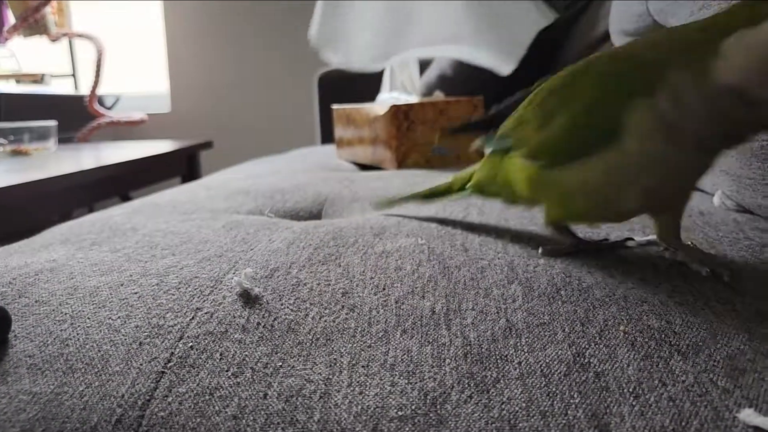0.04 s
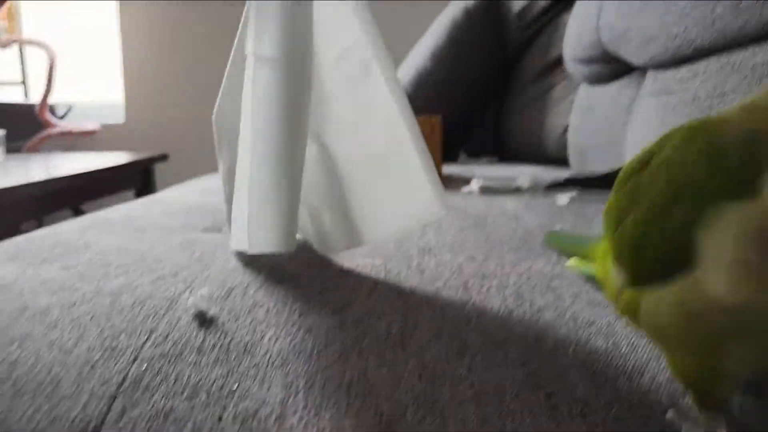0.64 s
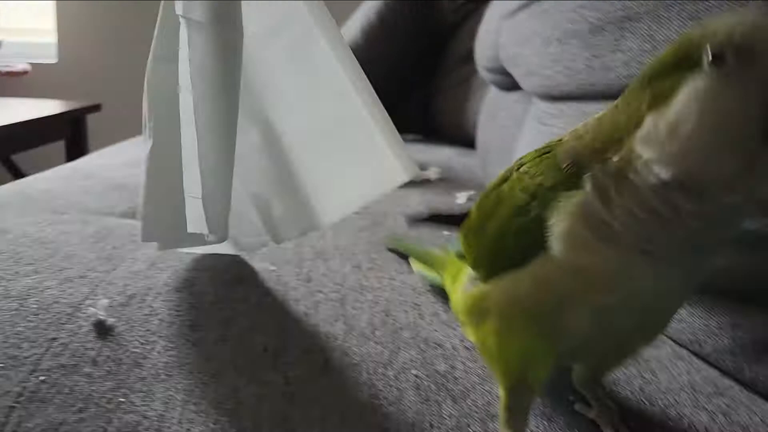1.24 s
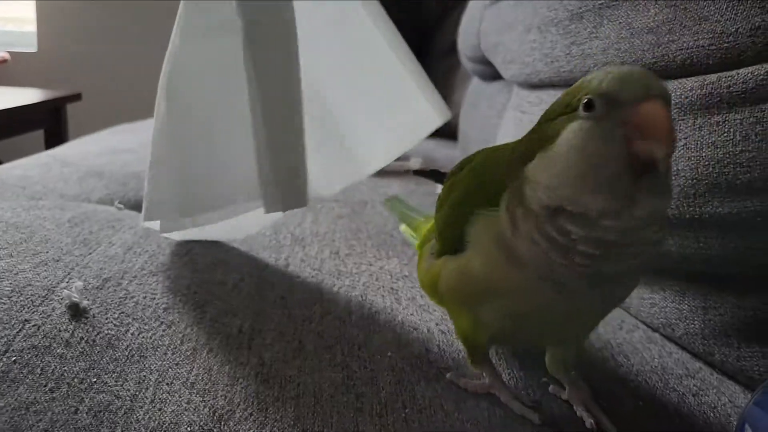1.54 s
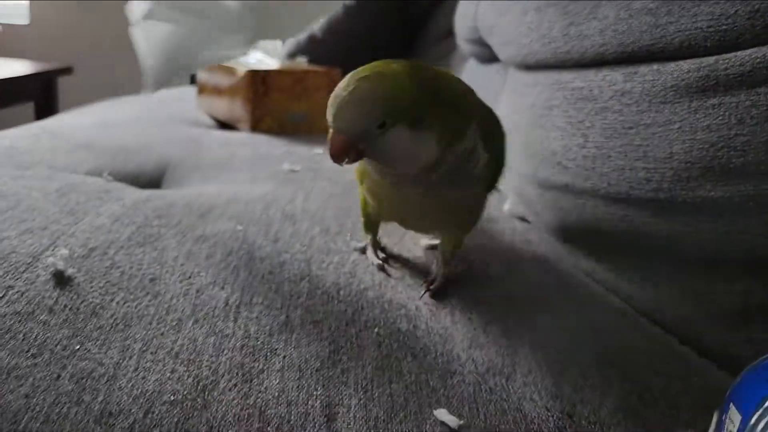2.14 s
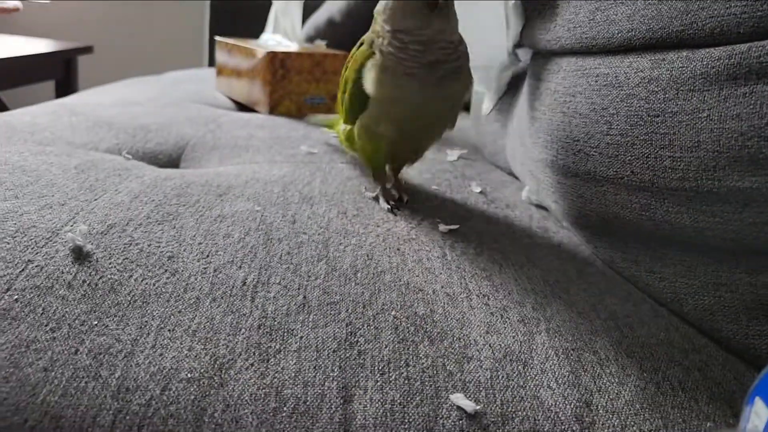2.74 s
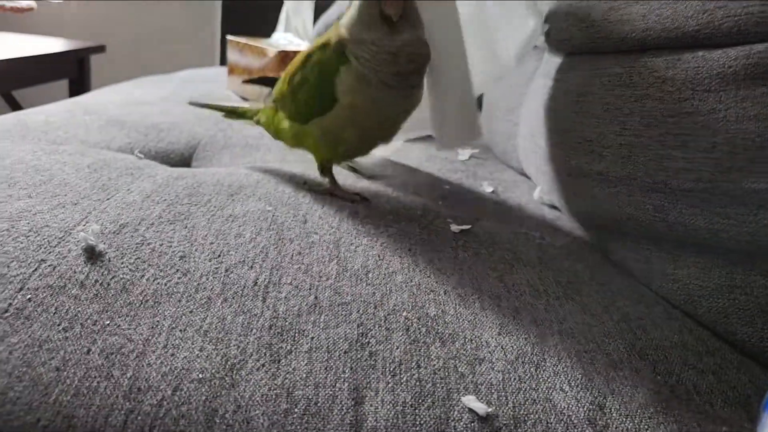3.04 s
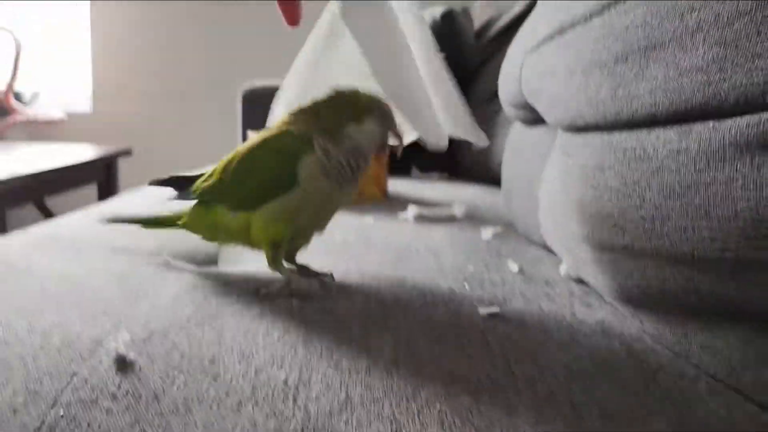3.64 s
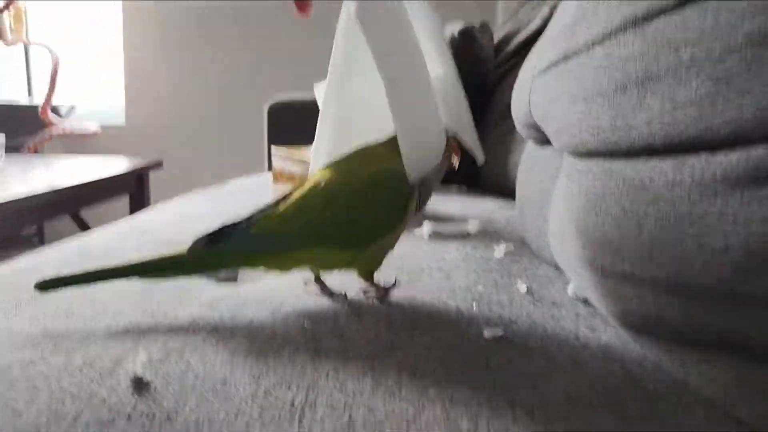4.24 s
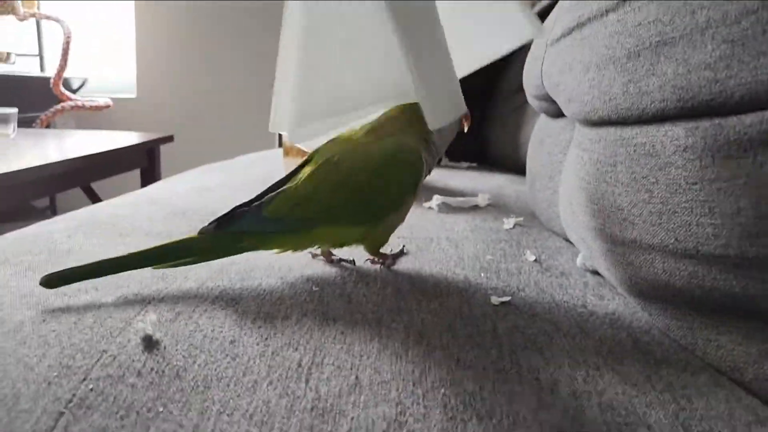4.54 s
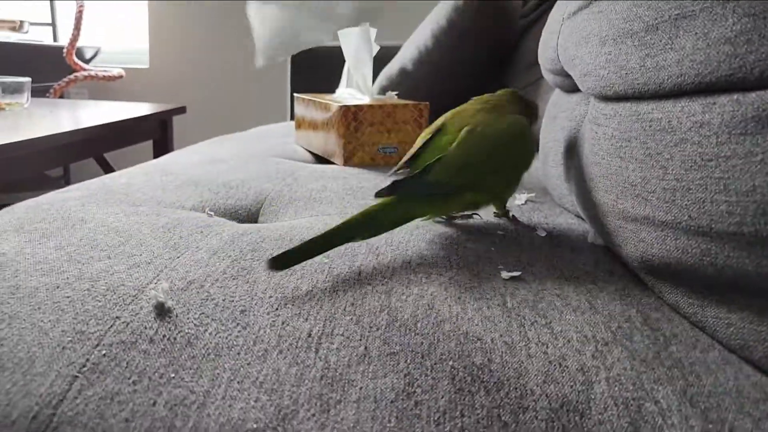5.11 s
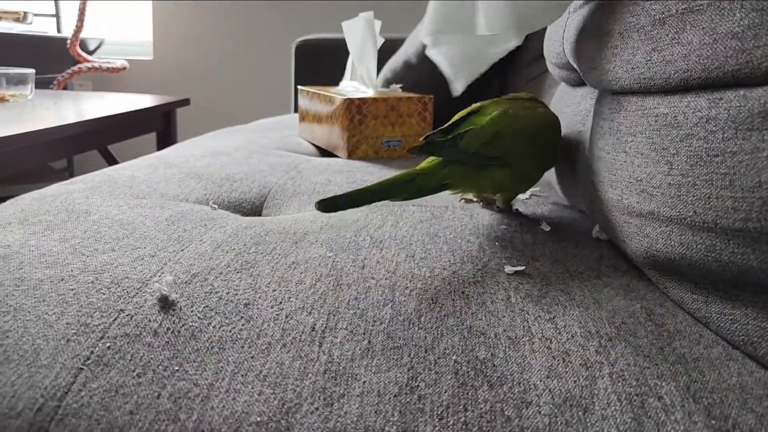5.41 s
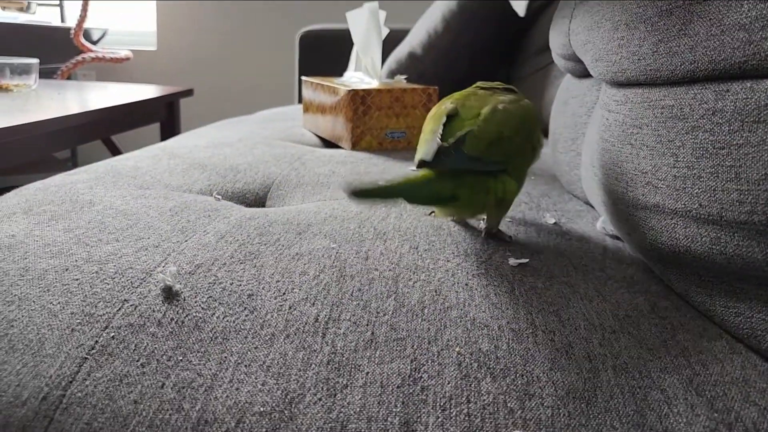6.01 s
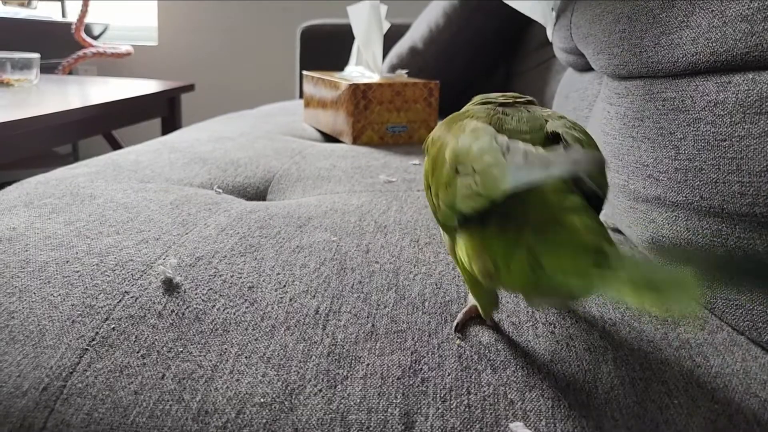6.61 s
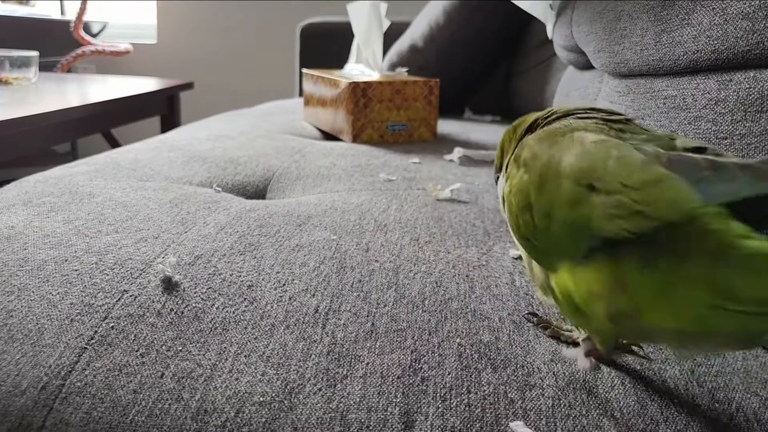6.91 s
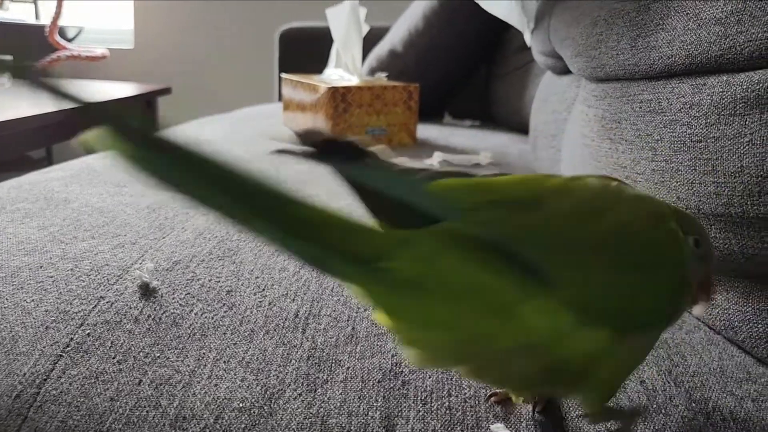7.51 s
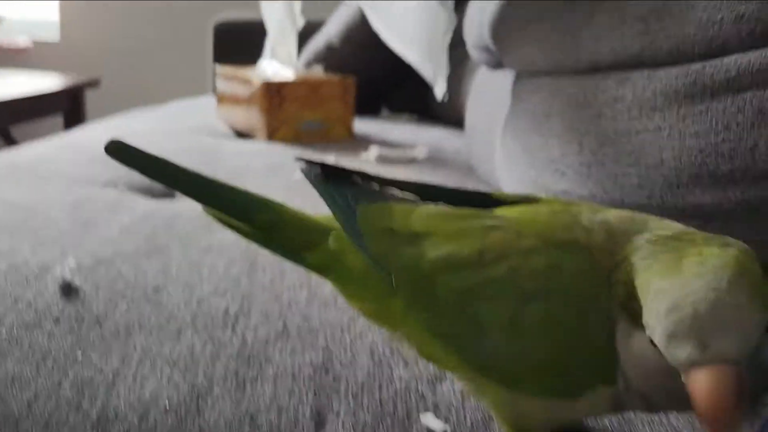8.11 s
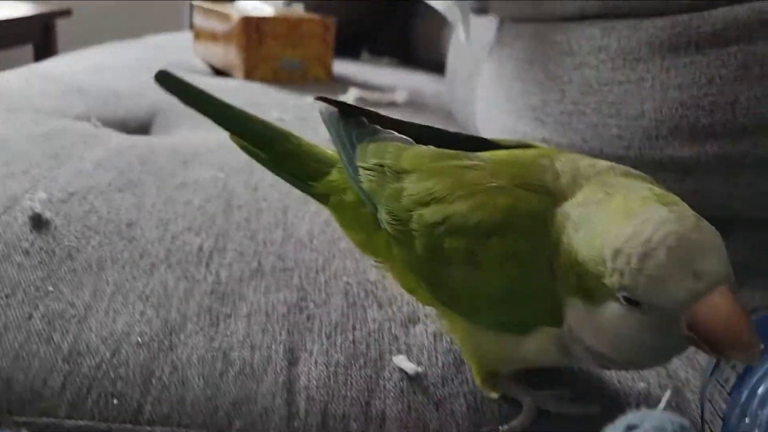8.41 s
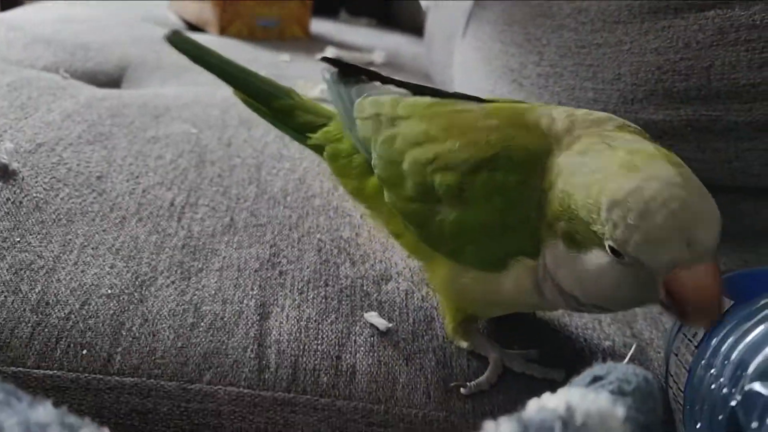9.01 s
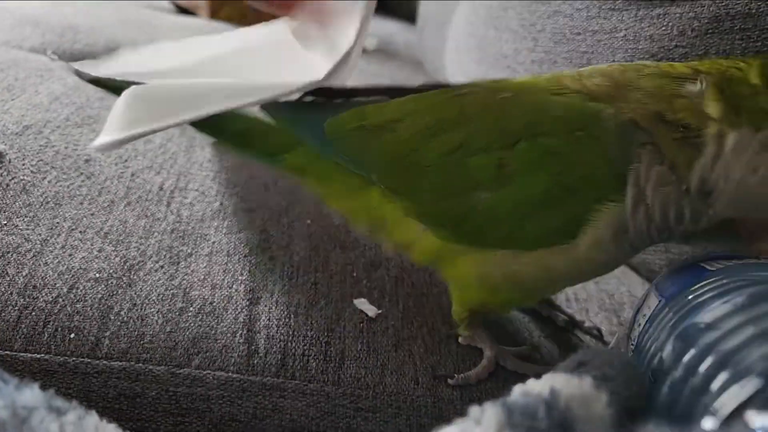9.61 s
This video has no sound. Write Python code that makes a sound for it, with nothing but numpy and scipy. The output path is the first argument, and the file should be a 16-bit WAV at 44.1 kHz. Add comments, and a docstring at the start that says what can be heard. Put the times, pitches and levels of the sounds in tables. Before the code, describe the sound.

A small parrot chatters close to the microphones in a quiet living room with a faint low rumble. From the start until about 3.2 seconds it gives short, hoarse clucks, several a second, with two clean rising whistles between 0.5 and 0.8 seconds and a falling chirp at 1.2. Three more chirps grow softer between 3.3 and 3.8 seconds. A tissue swishes very faintly underneath, and briefly again in the lull at 5 seconds. From 5.2 to 8.2 seconds the bird runs through fast, trilled warbles, with two loud, bright, falling squawks at about 6.8 and 7.3 seconds. From 7.7 to 9.5 seconds its steps and bumps make soft thuds and set a plastic bottle ringing low and hollow, while beak and claws add sharp little ticks and faint scratching. One quiet falling chirp comes at 9.5 seconds.

```python
"""Parrot on a sofa

A small parrot chatters while a dangled tissue swishes beside it. Its syrinx is the source, its throat
and beak the filter: hoarse clucks, whistles and chirps, then fast warbles and squawks. At the end it
steps up to a plastic bottle, bumps it into ringing and ticks at it with beak and claws.
Two close microphones pick up the bird, the faint answer of the living room and a low rumble."""
import sys
import numpy as np
from scipy import signal
from scipy.fft import rfft, irfft, next_fast_len
from scipy.io import wavfile
from scipy.ndimage import uniform_filter1d, map_coordinates

SR = 44100
rng = np.random.default_rng(int(sys.argv[2]) if len(sys.argv) > 2 else 0)


def waveform_to_disk(signal):
    """Save audio, clipped to [-1, 1], as 16-bit WAV at the path in sys.argv[1]."""
    frames = np.transpose(np.atleast_2d(signal))
    scaled = np.clip(frames, -1, 1) * 32767
    samples = np.round(scaled).astype(np.int16)
    wavfile.write(sys.argv[1], SR, samples)


N = 429975
EDGE_HZ = 16200  # upper band limit
FLUTTER_HZ = 80  # bandwidth of quick, random wavering

# response of throat and beak in clucks, whistles and chirps: (frequency [Hz], gain [dB])
SHORT_CALL_TRACT = [(300, -15), (550, 0.5), (1100, -4.5), (1800, 1), (3500, -0.4), (5000, -9.5),
                    (7700, -15), (9300, -31.5)]
# response of throat and beak in warbles and squawks: (frequency [Hz], gain [dB])
WARBLE_TRACT = [(500, -13), (800, -6.5), (1200, -7.5), (2200, -2.5), (3500, -1.5), (4600, -5.5),
                (5500, -15), (8200, -18), (10000, -16.5), (13000, -33)]
# response of the plastic to a tick or scratch: (frequency [Hz], gain [dB])
PLASTIC_RESPONSE = [(1500, 9), (4500, -2), (7000, -15.5), (15000, -6)]


def gain_of(db):
    """Amplitude ratio of a level in decibels."""
    return 10 ** (np.asarray(db) / 20)


def unit_rms(x):
    """Normalisation to an rms of 1."""
    return x / np.sqrt(np.mean(x ** 2) + 1e-20)


def gain_at(points, hz):
    """Amplitude gain of a decibel spectrum, interpolated over log frequency."""
    f, db = np.transpose(points)
    return gain_of(np.interp(np.log(hz + 1), np.log(f + 1), db))


def add(mix, s, sound):
    """Superposition: a sound joins the mix at time s."""
    part = mix[max(round(s * SR), 0):][:len(sound)]
    part += sound[:len(part)]


def coloured(x, points):
    """Zero-phase filtering by a decibel spectrum."""
    size = next_fast_len(2 * x.shape[-1])
    spectrum = rfft(x, size) * gain_at(points, np.fft.rfftfreq(size, 1 / SR))
    return irfft(spectrum, size)[..., :x.shape[-1]]


def wander(count, hz):
    """Low-pass Gaussian noise of rms 1, reaching to about hz."""
    f = np.fft.rfftfreq(count, 1 / SR)
    return unit_rms(irfft(rfft(rng.standard_normal(count)) * np.exp(-(f / hz) ** 2), count))


def background(rumble_db=-56, whine_hz=4300, whine_db=-82):
    """Partly coherent noise: rumble alike on both sides, faint diffuse hiss, and a thin whine."""
    # spectrum of the quiet room: (frequency [Hz], relative density [dB])
    ambience = [(20, -33), (59, -3.5), (87, -12.5), (210, -22), (450, -21.5), (1100, -35), (4400, -44.5),
                (5600, -57), (15000, -60)]
    # its stereo width: (frequency [Hz], side over middle [dB])
    width = [(60, -24), (180, -13), (550, -4), (1650, 1)]
    mid, side = unit_rms(coloured(rng.standard_normal((2, N)), ambience))
    side = coloured(side, width)
    whine = gain_of(whine_db) * np.sin(2 * np.pi * whine_hz * np.arange(N) / SR)
    return gain_of(rumble_db) * (mid + np.array([side, -side])) + whine


def fading_note(hz=2643, db=-47, t60=.3):
    """Exponential decay: a thin, wavering note dies away at the start."""
    t = np.arange(N) / SR
    envelope = gain_of(db - 60 * np.minimum(t / t60, 2))
    return envelope * np.sin(2 * np.pi * hz * t + wander(N, FLUTTER_HZ) / 2)


def ticks(decay_s=0.00066, lowest_hz=1200):
    """Impact excitation: beak and claws strike short, heavily damped knocks from the plastic."""
    # strikes: (time [s], peak before filtering [dB])
    strikes = [(0.092, -28), (7.871, -28), (8.351, -29), (8.397, -34.5), (8.565, -32), (8.814, -40),
               (8.927, -40), (9.053, -28)]
    out, t = np.zeros(N), np.arange(SR // 2) / SR
    for s, db in strikes:
        hz = lowest_hz * 2 ** rng.random()  # each spot knocks at its own pitch
        tick = (rng.standard_normal(len(t)) + np.sin(2 * np.pi * hz * t)) * np.exp(-t / decay_s)
        add(out, s, gain_of(db) * coloured(tick / abs(tick).max(), PLASTIC_RESPONSE))
    return out


def tract_response(tract, delay_s_per_khz=.0003):
    """Minimum-phase cavity response at each whole Hz; dispersion in the windpipe delays high partials."""
    hz = abs(np.fft.fftfreq(SR, 1 / SR))
    log_response = np.conj(signal.hilbert(np.log(gain_at(tract, hz))))
    return np.exp(log_response - 1j * np.pi * delay_s_per_khz * hz ** 2 / 1000)


def syrinx(start, hz, db, beak_db, nasal_hz, tract, jitter, rasp_db, steady,
           fade_s=.005, brighten=0.36, wobble=.3):
    """Source and filter: membranes pulse into the tract, and the slacker they are, the more unevenly."""
    # hiss of air at the edge of the beak: (frequency [Hz], gain [dB])
    edge_hiss = [(8500, -44.5), (11500, -0.5)]
    nasal_db, nasal_half_width_octaves = 4.5, 0.088
    wobble_hz, fray_rad, doubling = 98, 0.02, 0.068
    flutter_db, sizzle_db = 2.5, -5.5
    hz, db = (np.pad(curve, int(fade_s / 2 * SR), "edge") for curve in (hz, db))
    count, slack = len(hz), np.minimum(900 / hz, 1)
    hz = hz * np.exp(jitter * (slack * wander(count, 340) + wobble * wander(count, wobble_hz)))
    # each pulse comes a little early or late, which frays the high harmonics
    phase = 2 * np.pi * np.cumsum(hz) / SR + fray_rad * wander(count, 800)
    harmonic = np.arange(1, int(EDGE_HZ / hz.min()) + 1)[:, None]
    partial_hz = harmonic * hz
    # a harder push and a wider beak make the call brighter
    effort_db = db + 25.5
    tilt = gain_of((brighten * effort_db - beak_db) * np.log2(harmonic))
    # the nasal resonance drifts as the tongue moves
    detune = np.log2(partial_hz / nasal_hz) + .06 * wander(count, 40)
    nasal = 1 + (gain_of(nasal_db) - 1) / (1 + 1j * detune / nasal_half_width_octaves)
    cavity = tract_response(tract)[np.minimum(partial_hz, EDGE_HZ).astype(int)]
    weight = cavity * (partial_hz < EDGE_HZ) * tilt * nasal
    weight[1] *= (hz / 750) ** 0.5  # taut membranes favour the second harmonic
    strength = np.sqrt((abs(weight) ** 2).sum(0) / 2)
    tone = -(weight * np.exp(1j * harmonic * phase)).real.sum(0) / strength
    # period doubling: now and then strong and weak pulses alternate
    tone *= 1 + doubling * wander(count, wobble_hz) * np.cos(phase / 2)
    # air hisses through each opening of the membranes
    air = rng.standard_normal(count) * (1 + np.cos(phase)) ** 2
    sizzle = gain_of(sizzle_db + effort_db) * unit_rms(coloured(air, edge_hiss))
    puffs = unit_rms(coloured(air, tract)) + sizzle
    shimmer = np.exp(4 * jitter * slack * wander(count, 700))
    voice = tone * shimmer + gain_of(rasp_db) * slack * puffs
    flutter = gain_of(flutter_db * np.tanh(wander(count, FLUTTER_HZ)))
    # the call swells when a harmonic meets a resonance, unless the bird holds it steady
    voice = unit_rms(voice * strength ** (1 - steady) * flutter)
    fades = signal.windows.tukey(count, min(1, 2 * fade_s * SR / count))
    return start - fade_s / 2, voice * gain_of(db) * fades


def push(length, loudest, swell_db_per_s, drop_db, onset_db=2.5, attack_s=0.0083):
    """Envelope of one breath in dB: a quick attack, a steady swell, then an ever faster fall."""
    progress, top = np.linspace(0, 1, int(length * SR)), np.clip(loudest, 0, .95)
    attack = onset_db * np.exp(-progress * length / attack_s)
    swell = swell_db_per_s * length * np.maximum(top - progress, 0)
    fall = drop_db * (np.maximum(progress - top, 0) / (1 - top)) ** 1.29
    return -attack - swell - fall


def gliding_calls(table, tract, swell_db_per_s, drop_db, **voice):
    """Frequency glides: on one breath each, the pitch slides to a turning point and on to its end."""
    out = np.zeros(N)
    for start, length, start_hz, turn_hz, end_hz, turn, db, loudest, beak_db, nasal_hz in table:
        progress = np.linspace(0, 1, int(length * SR))
        log_hz = np.interp(progress, [0, np.clip(turn, .05, .95), 1], np.log([start_hz, turn_hz, end_hz]))
        level_db = db + push(length, loudest, swell_db_per_s, drop_db)
        add(out, *syrinx(start, np.exp(log_hz), level_db, beak_db, nasal_hz, tract, **voice))
    return out


def clucks():
    """Aperiodic vibration: strong jitter and breath noise make these short calls hoarse."""
    # clucks: (start [s], length [s], start pitch [Hz], turning pitch [Hz], end pitch [Hz], turn at [0-1],
    # level [dB], loudest at [0-1], beak muffling [dB/octave], nasal resonance [Hz])
    cluck_calls = [(0.113, 0.073, 908, 911, 515, 0.3, -19.5, 0, 2, 1680),
                   (0.313, 0.047, 824, 982, 409, 0.35, -20.5, 0.42, 0.5, 2330),
                   (0.916, 0.039, 1494, 944, 669, 0.43, -23.5, 0.81, 2, 1800),
                   (0.967, 0.042, 688, 635, 504, 0.44, -27.5, 0.38, 3, 1410),
                   (1.361, 0.076, 951, 888, 485.4, 0.42, -19.5, 0.63, -1, 1590),
                   (1.556, 0.057, 596, 811, 521, 0.52, -24.5, 0.92, -2, 1670),
                   (1.742, 0.05, 267, 599, 436, 0.73, -20, 0.6, 1.3, 2150),
                   (1.922, 0.053, 1222, 584, 489, 0.5, -20, 0.16, 2.5, 2430),
                   (2.141, 0.026, 1137, 632, 564, 0.53, -19.5, 0, 1.5, 2360),
                   (2.352, 0.019, 1456, 623, 540, 0.45, -20.5, 0.28, 1.7, 3020),
                   (2.556, 0.042, 846, 1245, 674, 0.24, -28.5, 0.52, 1, 3220),
                   (2.727, 0.057, 735, 1076, 459.4, 0.49, -26.5, 0.87, -0.7, 2180),
                   (2.948, 0.041, 171.3, 445, 520, 0.74, -30.5, 0.64, -2.7, 2620),
                   (3.134, 0.046, 760, 1301, 417, 0.21, -24, 0.03, 1, 2420)]
    return gliding_calls(cluck_calls, SHORT_CALL_TRACT, swell_db_per_s=217.5, drop_db=10, jitter=0.036,
                         rasp_db=-19, fade_s=.0026, steady=0.97, brighten=0.54, wobble=.8)


def tissue(flicker_db=8.7):
    """Stick-slip friction: soft paper fibres catch and let go in a fine-grained swish."""
    # swishes: (middle [s], length [s], level [dB], brightness [dB/octave])
    swishes = [(1.703, 2.8, -64.5, 11), (4.217, .3, -71, -5), (5.034, 0.1, -55.5, -8.5),
               (9.699, .2, -63.5, 19)]
    # spectrum of rubbing paper: (frequency [Hz], level [dB])
    paper_spectrum = [(1000, -37), (3500, -9.5), (6000, -25.5), (9500, -9.5), (15000, -20)]
    out = np.zeros(N)
    for s, length, db, tilt_db in swishes:
        count = int(length * SR)
        spectrum = [(hz, level + tilt_db * np.log2(hz)) for hz, level in paper_spectrum]
        grains = coloured(rng.laplace(size=count), spectrum) * gain_of(flicker_db * wander(count, 25))
        add(out, s - length / 2, gain_of(db) * unit_rms(grains) * np.hanning(count))
    return out


def whistles():
    """Nearly periodic vibration: the syrinx slides upward in two clean, slow whistles."""
    # one contour for each whistle: (time [s], pitch [Hz], level [dB])
    contours = [
        [(0.481, 736, -35), (0.514, 1370, -34.5), (0.552, 1650, -24.5), (0.579, 1923, -29), (0.6, 1300, -36.5)],
        [(0.66, 419, -32), (0.689, 1160, -26.5), (0.72, 1340, -29), (0.753, 1734, -26.5), (0.791, 2265, -34.5)],
    ]
    out = np.zeros(N)
    for contour in contours:
        s, pitch, level = np.transpose(contour)
        t = np.arange(s[0], s[-1], 1 / SR)
        hz = np.exp(np.interp(t, s, np.log(pitch)))
        add(out, *syrinx(s[0], hz, np.interp(t, s, level), beak_db=-0.5, nasal_hz=3350,
                         tract=SHORT_CALL_TRACT, jitter=0.014, rasp_db=-34.5, steady=0.83))
    return out


def chirps():
    """Resonance: falling chirps swell as their harmonics sweep through the peaks of the tract."""
    # chirps: columns as for the clucks
    chirp_calls = [(1.194, 0.07, 2232, 1740, 647, 0.35, -27.5, 0.32, -0.79, 3270),
                   (3.3, 0.058, 1577, 1189, 374.6, 0.52, -30, 0.37, -0.3, 1670),
                   (3.507, 0.041, 1311, 1314.0, 420, 0.55, -32, 0.66, 1.9, 2370),
                   (3.787, 0.078, 2560, 1830, 723, 0.46, -39.5, 0.45, -0.48, 1400),
                   (9.542, 0.04, 1596, 1444, 329, 0.32, -37, 0.42, -1.4, 4100)]
    return gliding_calls(chirp_calls, SHORT_CALL_TRACT, swell_db_per_s=225, drop_db=2,
                         jitter=0.033, rasp_db=-20.5, steady=0.17)


def trill(start, length, start_hz, rise_s=.008, sag_s=0.017, last_sag_ratio=.64):
    """Frequency modulation: the pitch sags to a low note, rests, and springs up at each flick."""
    # flicks of pitch: (time of the top [s], low pitch [Hz], top pitch [Hz])
    flicks = [(5.268, 1054, 2173), (5.292, 998, 2180), (5.321, 1035, 2420), (5.434, 787, 1042),
              (5.487, 725, 2365), (6.222, 830, 2498), (6.242, 987, 2413), (6.286, 907.5, 2470),
              (6.403, 741, 1049), (6.427, 683, 1281), (6.449, 914, 2116), (6.479, 1534, 2630),
              (6.594, 912, 1682), (6.619, 988, 1818), (6.648, 1413, 2574), (6.676, 1846, 2460),
              (6.949, 898, 1172), (6.975, 824, 1538), (7.001, 878, 2240), (7.028, 1396, 2657),
              (7.152, 882, 1556), (7.178, 960, 1768), (7.207, 1454, 2400), (7.234, 1630, 2507),
              (7.544, 642.5, 1100), (7.596, 1366, 2594), (7.735, 873, 1964), (7.756, 722, 1923),
              (7.786, 1008, 1923), (7.922, 1060, 2830), (7.953, 1484, 2830), (7.988, 1435, 2647),
              (8.111, 746, 1044), (8.134, 674, 1418), (8.161, 809, 2007)]
    knots = [(start, start_hz)]
    for s, low_hz, top_hz in flicks:
        if start < s < start + length:
            spring = s - rise_s
            knots += [(min(knots[-1][0] + sag_s, spring), low_hz), (spring, low_hz), (s, top_hz)]
    knots.append((knots[-1][0] + sag_s, knots[-1][1] * last_sag_ratio))
    s, hz = np.transpose(knots)
    log_hz = np.interp(start + np.arange(int(length * SR)) / SR, s, np.log(hz))
    return np.exp(uniform_filter1d(log_hz, int(rise_s / 2 * SR)))


def warbles(dip_db_per_octave=0.5):
    """Coupled pitch and amplitude modulation: each trilled syllable thins at the top of a flick."""
    # syllables: (start [s], length [s], start pitch [Hz], level [dB], loudest at [0-1],
    # beak muffling [dB/octave])
    syllables = [(5.237, 0.098, 1295, -27, 0.36, -1.5), (5.399, 0.11, 1467, -30.5, 0.8, 1),
                 (6.204, 0.098, 1297, -23, 0.34, -1.9), (6.371, 0.12, 1637, -25, 0.62, 3),
                 (6.551, 0.13, 823, -21, 0.29, -1), (6.918, 0.13, 1610, -23.5, 0.38, 0.5),
                 (7.11, .14, 777, -20, .2, -0.35), (7.487, 0.081, 943, -33.5, 0, 6.5),
                 (7.568, 0.044, 2295, -30, 0.33, 6), (7.697, 0.098, 1180, -20.5, 1, 3.5),
                 (7.896, 0.11, 1745, -24.5, 0.95, 4), (8.079, 0.091, 1055, -27, 0.26, 4.5)]
    out = np.zeros(N)
    for start, length, start_hz, db, loudest, beak_db in syllables:
        hz = trill(start, length, start_hz)
        level_db = db + push(length, loudest, swell_db_per_s=130, drop_db=4.5)
        level_db -= dip_db_per_octave * np.log2(hz / hz.mean())
        add(out, *syrinx(start, hz, level_db, beak_db, nasal_hz=2330, tract=WARBLE_TRACT,
                         jitter=0.01, rasp_db=-32, steady=1, brighten=0.33, wobble=1.2))
    return out


def squawks():
    """Harmonics grow with effort: two loud, bright squawks fall in pitch, then a soft croak follows."""
    # squawks and croak: columns as for the clucks
    squawk_calls = [(6.775, 0.098, 1473.0, 1133, 667, 0.39, -18, 0.23, -1.76, 2500.0),
                    (7.333, 0.096, 1390, 932, 458.6, 0.5, -19.5, 0.29, -1.1, 2600),
                    (7.44, 0.042, 484, 529, 420, 0.56, -36, 0.31, 4.5, 2580.0)]
    return gliding_calls(squawk_calls, WARBLE_TRACT, swell_db_per_s=198, drop_db=8.5,
                         jitter=0.008, rasp_db=-31, steady=0.4)


def bumps(rise_s=0.0024, decay_s=0.019):
    """Modal ringing: steps and bumps, softened by the cushion, thud and excite the bottle."""
    # steps and bumps: (time [s], level [dB])
    impacts = [(7.694, -35.5), (7.755, -36.5), (8.195, -40), (8.519, -44), (9.047, -41.5), (9.389, -45.5),
               (9.44, -42)]
    # modes of the bottle: (frequency [Hz], relative level [dB], time to fall 60 dB [s])
    bottle_modes = [(123, 0, 0.66), (367, 4, 0.28)]
    out, t = np.zeros(N), np.arange(SR // 2) / SR
    ring = sum(gain_of(db - 60 * t / t60) * np.sin(2 * np.pi * hz * t) for hz, db, t60 in bottle_modes)
    hardest_db = max(db for _, db in impacts)
    for s, db in impacts:
        thud = wander(len(t), 310) * np.exp(-t / decay_s)
        coupling = gain_of(2 * (db - hardest_db))  # light steps barely stir the bottle
        add(out, s, gain_of(db) * (1 - np.exp(-t / rise_s)) * (thud + coupling * ring))
    return out


def scrapes(start_s=8.3, end_s=9.5, db=-69.5, scratches_per_s=250):
    """Shot noise: clumps of tiny scratches as the claws grip fabric and plastic."""
    out, count = np.zeros(N), int((end_s - start_s) * SR)
    grains = rng.standard_normal(count) * (rng.random(count) < scratches_per_s / SR)
    grains *= np.exp(wander(count, 17))
    add(out, start_s, gain_of(db) * unit_rms(coloured(grains, PLASTIC_RESPONSE)))
    return out


def room(x, t60=0.26, early_s=0.0021, early_db=3, echoes_per_s=2500):
    """Reverberation: early reflections off the sofa, then a short tail that has lost its treble."""
    t = np.arange(SR // 2) / SR
    taps = rng.standard_normal((2, len(t))) * (rng.random((2, len(t))) < echoes_per_s / SR)
    tail = coloured(taps * gain_of(-60 * t / t60) * (t > early_s), [(4000, 0), (EDGE_HZ, -10)])
    early = taps * np.exp(-t / early_s) * t
    tail, early = (part / np.linalg.norm(part, axis=1, keepdims=True) for part in (tail, early))
    return signal.fftconvolve(x[None], tail + gain_of(early_db) * early, axes=1)[:, :N]


def scene():
    """Time and level differences between two microphones place the moving bird in the room."""
    # path of the bird: (time [s], lead at the left [ms], left over right [dB], feed to the room [dB])
    bird_path = [(.7, 0.364, 11.5, -16), (2.201, 0.056, 4, -18.5), (3, 0.074, 2.5, -13.5),
                 (5.3, 0.14, -3, -7), (6.25, 0.061, 5.5, -10.5), (6.75, 0.084, 0, -9),
                 (7.249, .18, 5, -14.5), (7.802, 0.39, 9, -14.5)]
    t = np.arange(N) / SR
    s, *columns = np.transpose(bird_path)
    lead_ms, pan_db, room_db = (np.interp(t, s, column) for column in columns)
    parrot = clucks() + chirps() + whistles() + squawks() + warbles()
    direct = parrot + ticks() + bumps() + scrapes() + tissue() + fading_note()
    delayed = map_coordinates(direct, [np.arange(N) - lead_ms * SR / 1000])
    pair = np.array([direct * gain_of(pan_db / 2), delayed * gain_of(-pan_db / 2)])
    return pair + room(direct * gain_of(room_db)) + background()


def record(dry):
    """Frequency response: each microphone port colours the sound, and a low-pass limits the band."""
    # response of the left port over the right: (frequency [Hz], gain [dB])
    port_balance = [(700, -2), (1900, 2), (4200, -2.5)]
    ports = [coloured(channel, [(hz, side * db / 2) for hz, db in port_balance])
             for channel, side in zip(dry, (1, -1))]
    low_pass = signal.firwin(511, EDGE_HZ, window=("kaiser", 9), fs=SR)
    return signal.oaconvolve(np.array(ports), low_pass[None], "same", axes=1)


dry = scene()
out = record(dry)
waveform_to_disk(out)
```